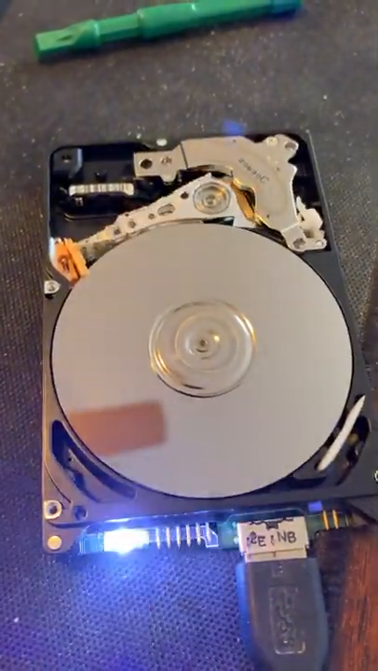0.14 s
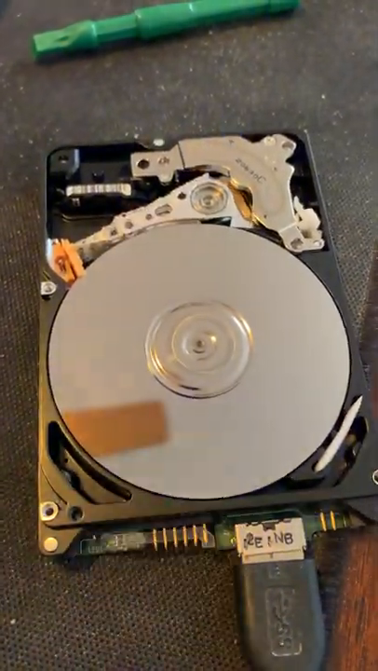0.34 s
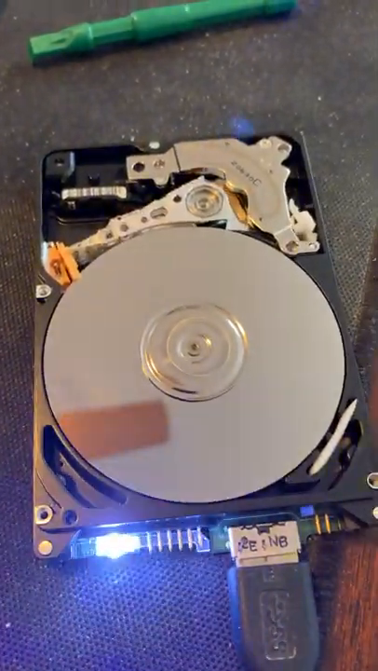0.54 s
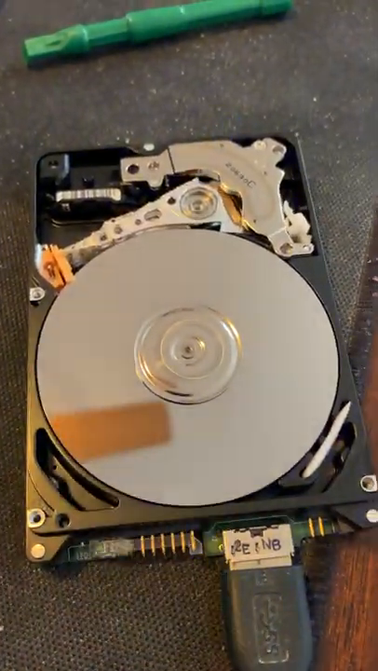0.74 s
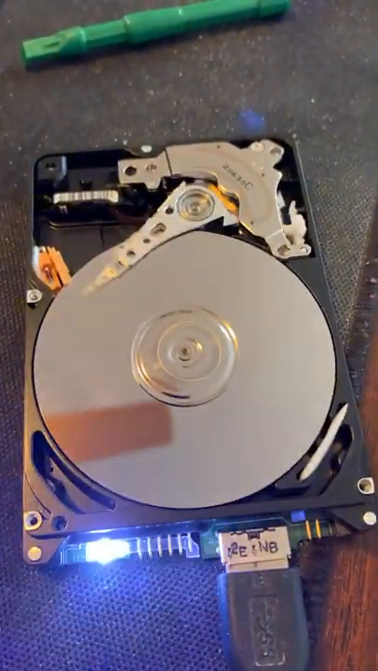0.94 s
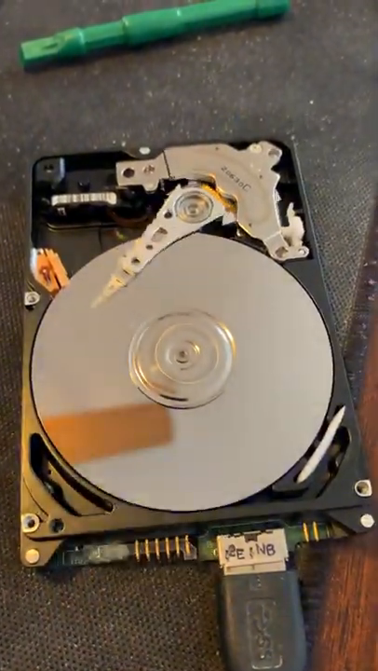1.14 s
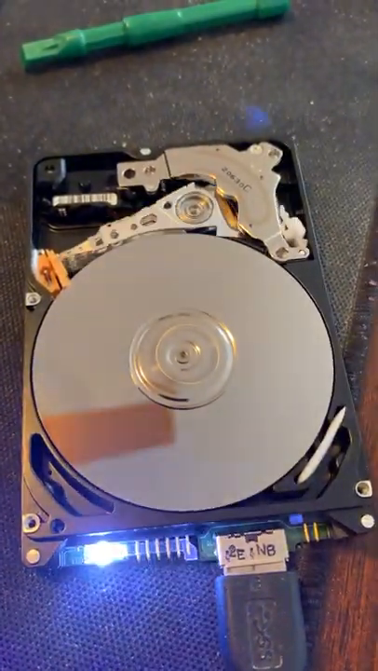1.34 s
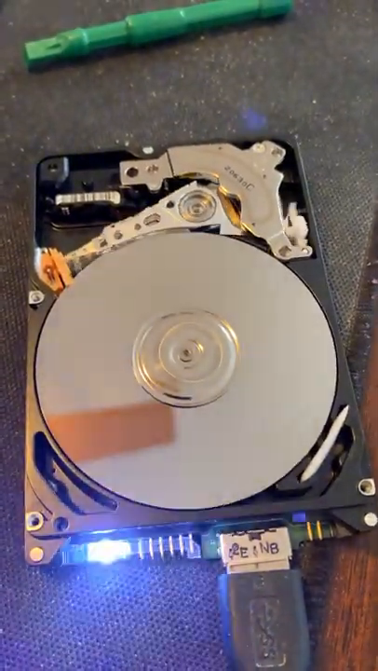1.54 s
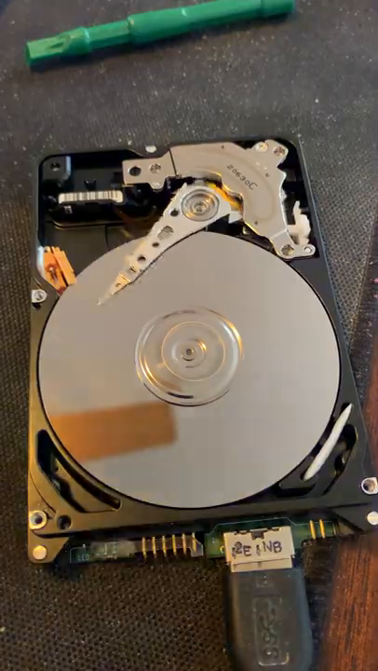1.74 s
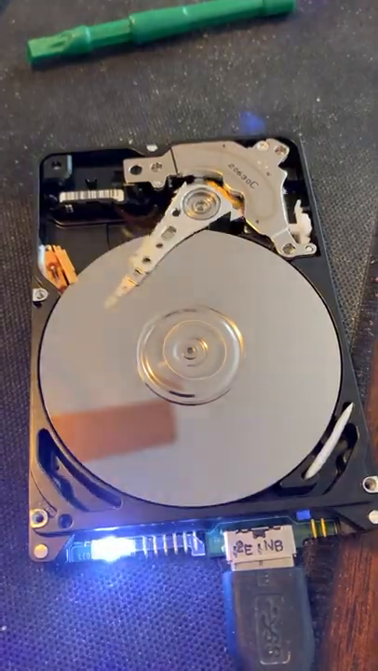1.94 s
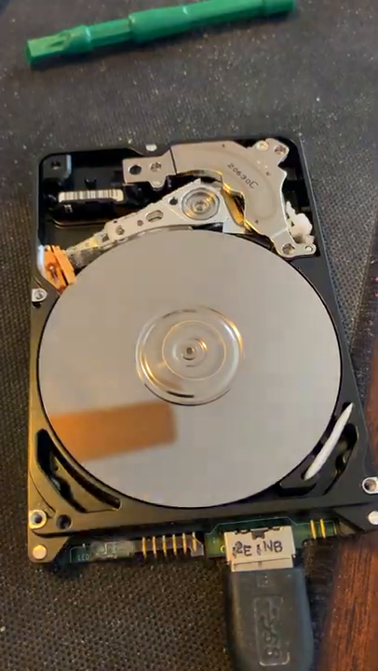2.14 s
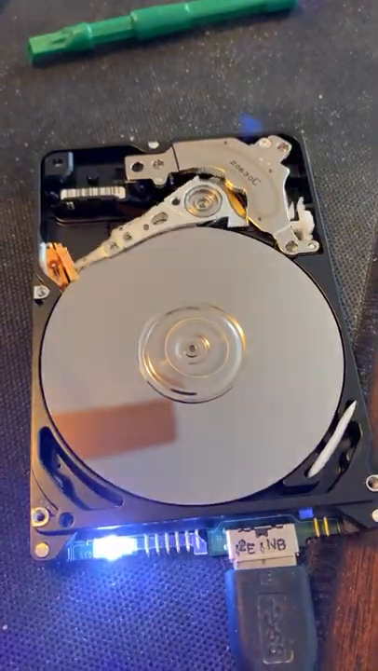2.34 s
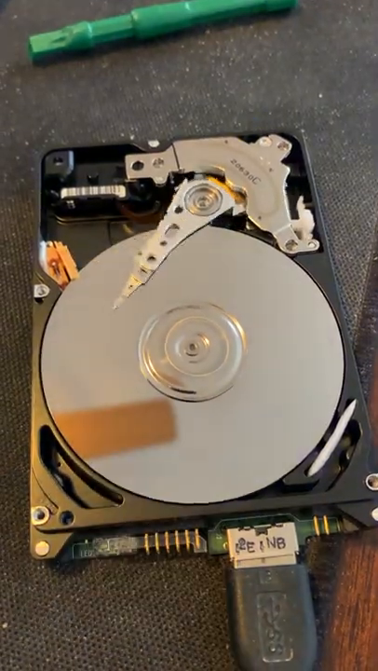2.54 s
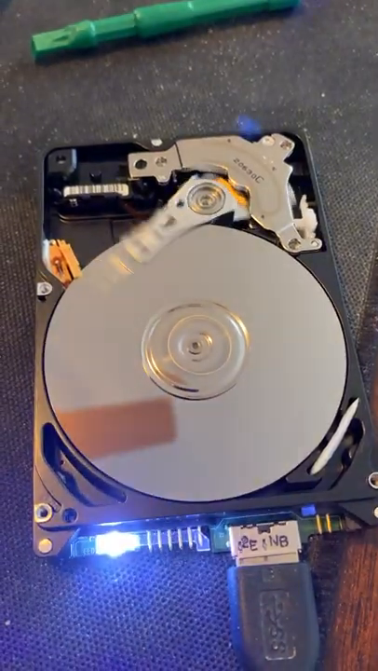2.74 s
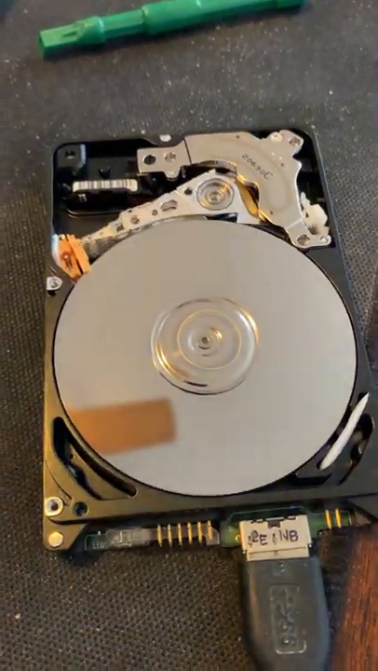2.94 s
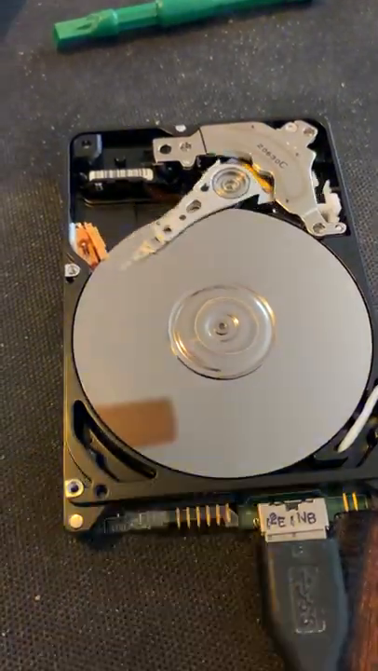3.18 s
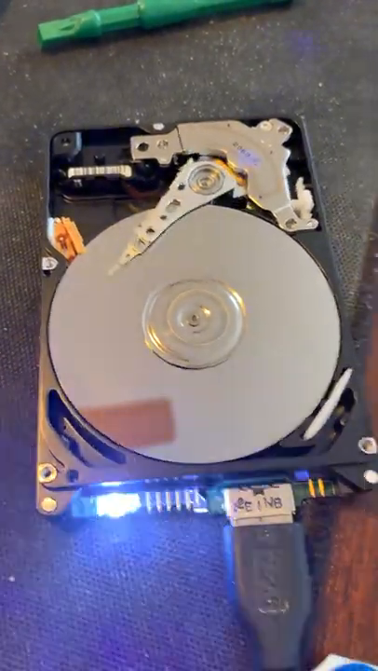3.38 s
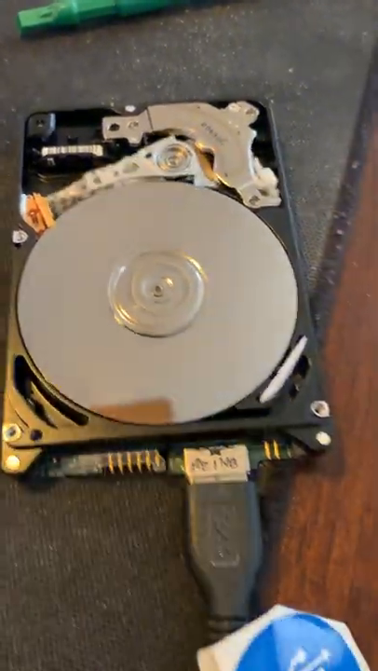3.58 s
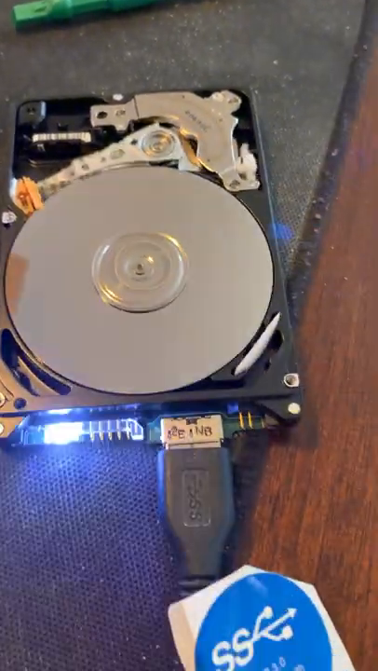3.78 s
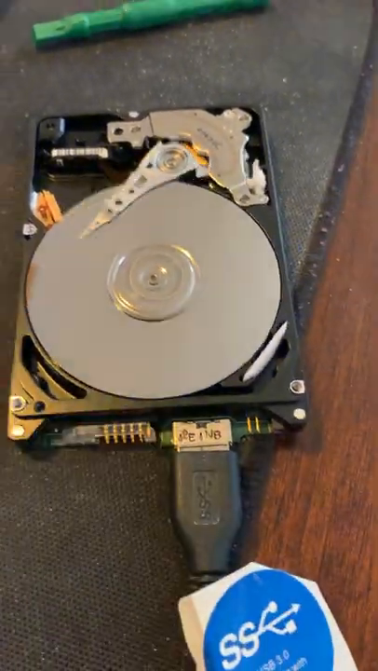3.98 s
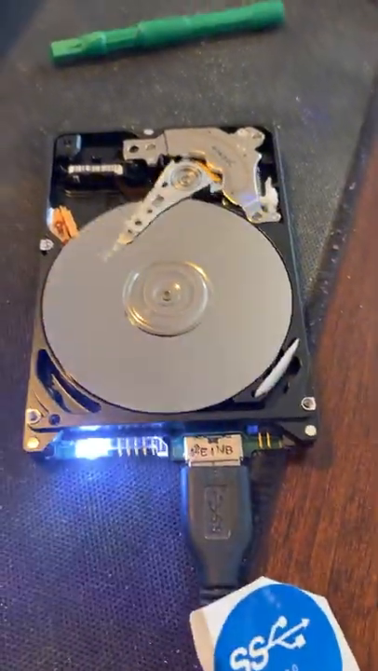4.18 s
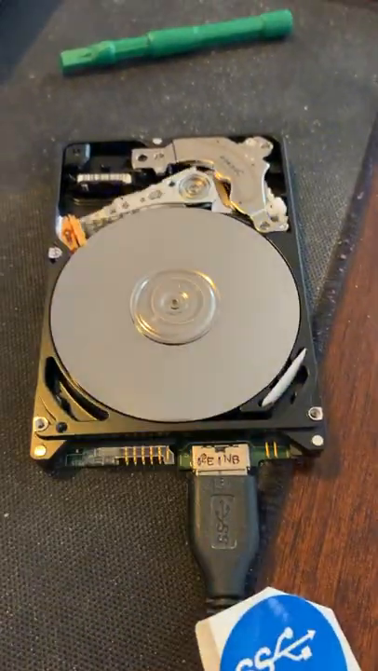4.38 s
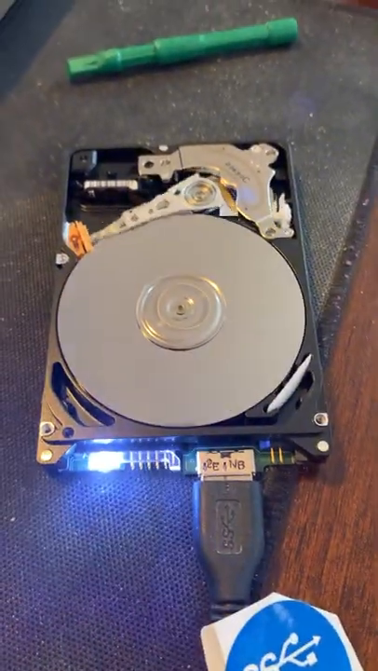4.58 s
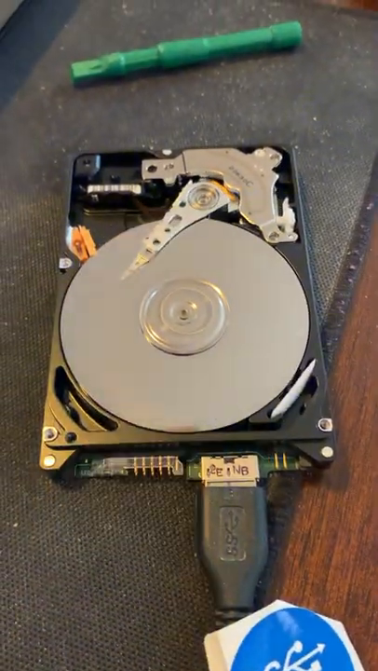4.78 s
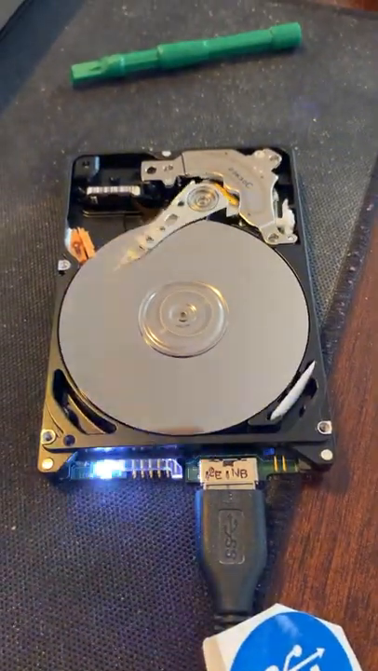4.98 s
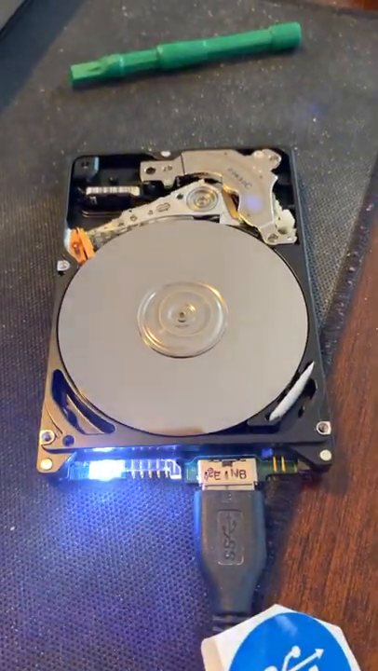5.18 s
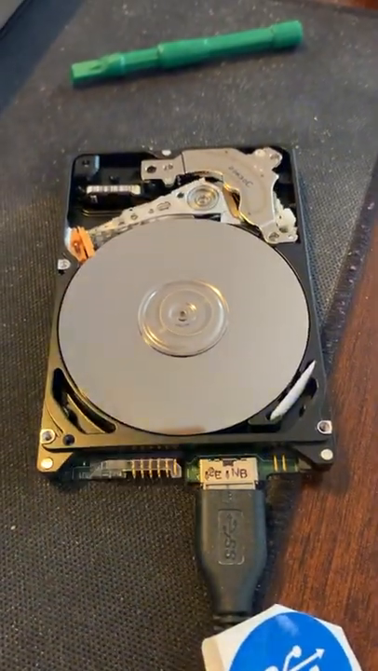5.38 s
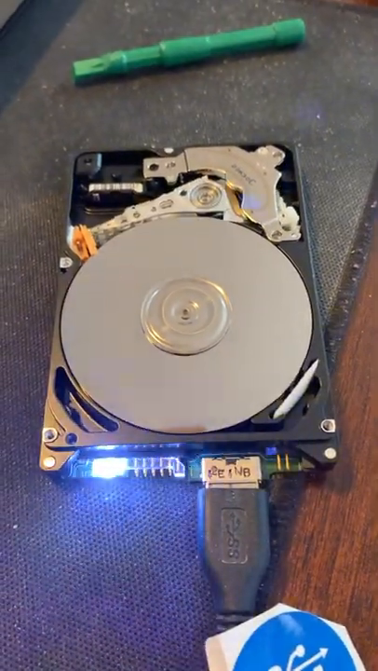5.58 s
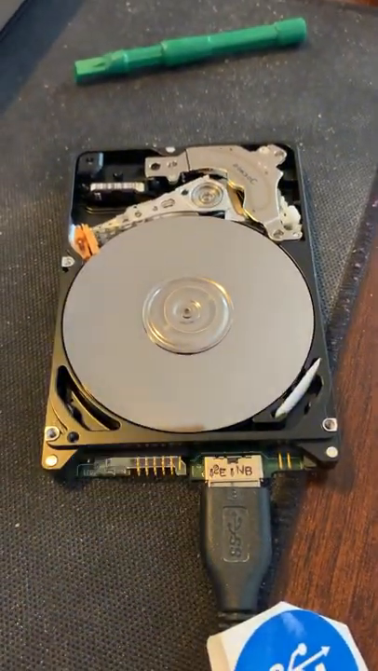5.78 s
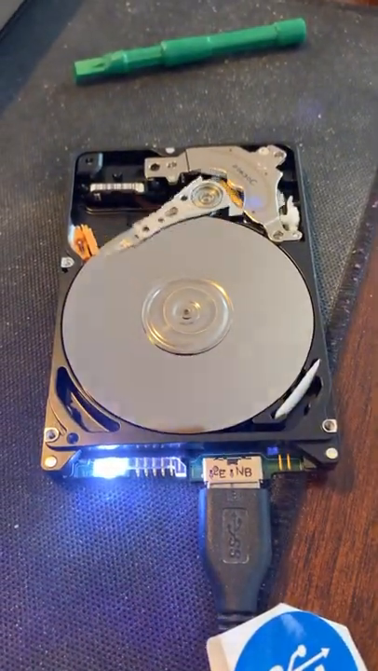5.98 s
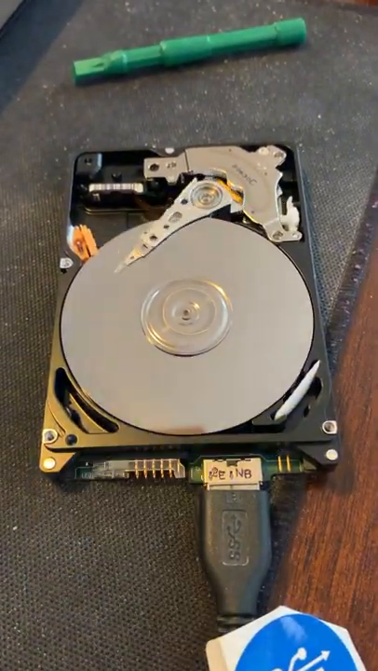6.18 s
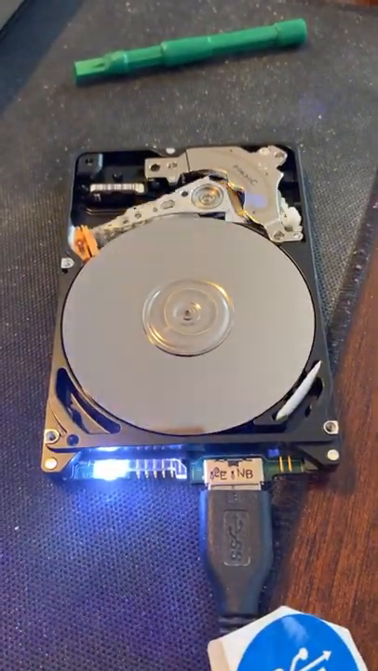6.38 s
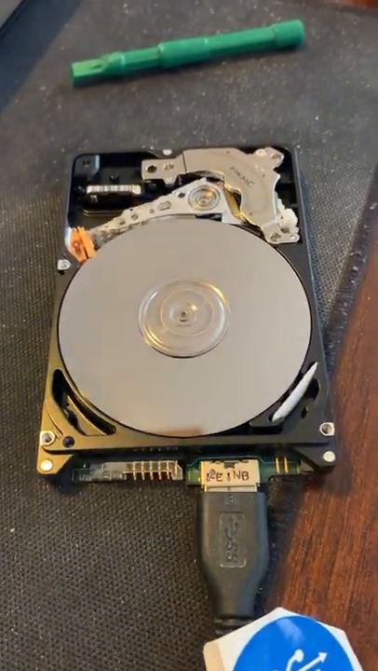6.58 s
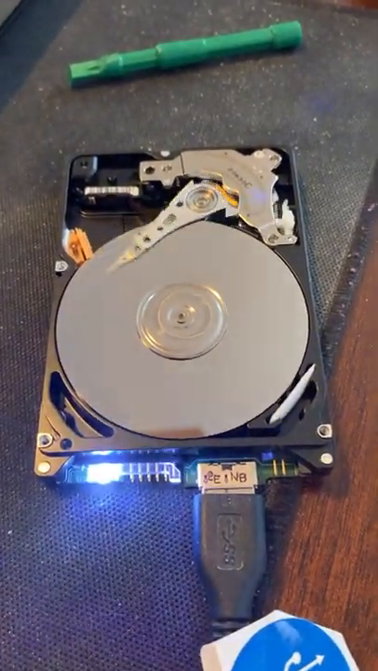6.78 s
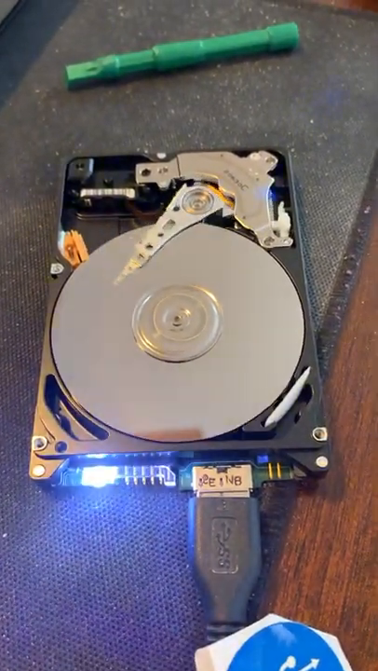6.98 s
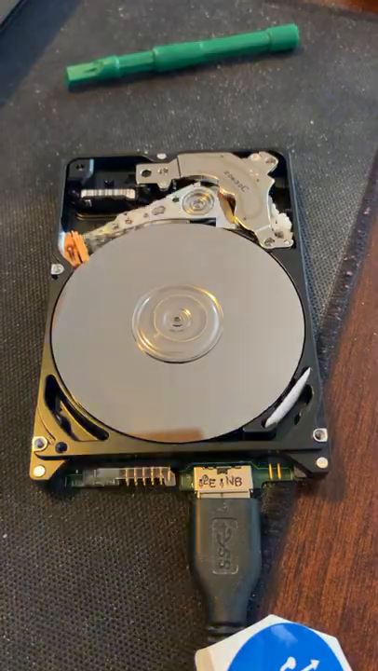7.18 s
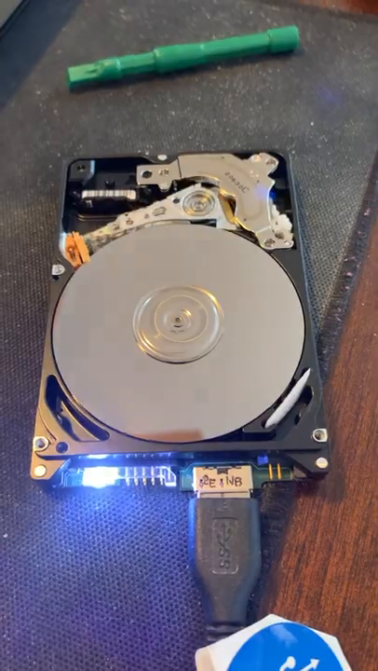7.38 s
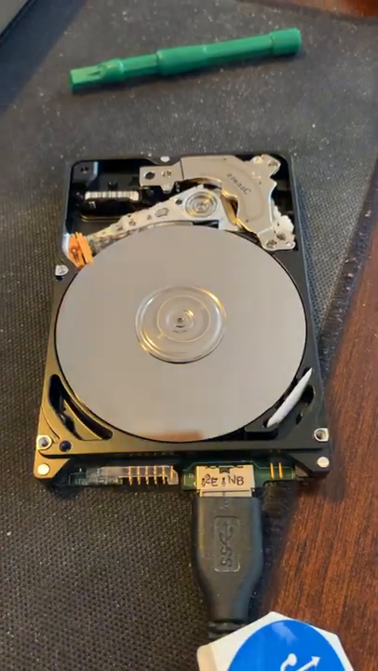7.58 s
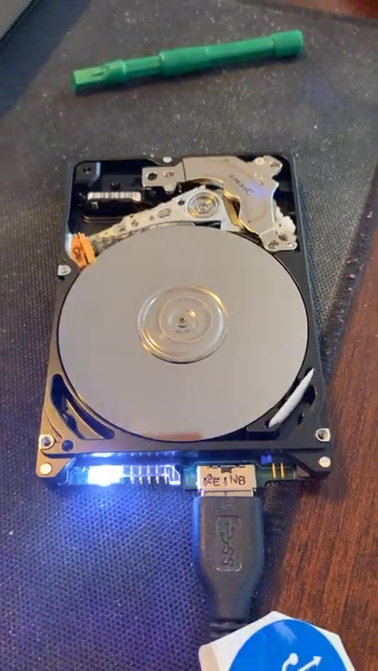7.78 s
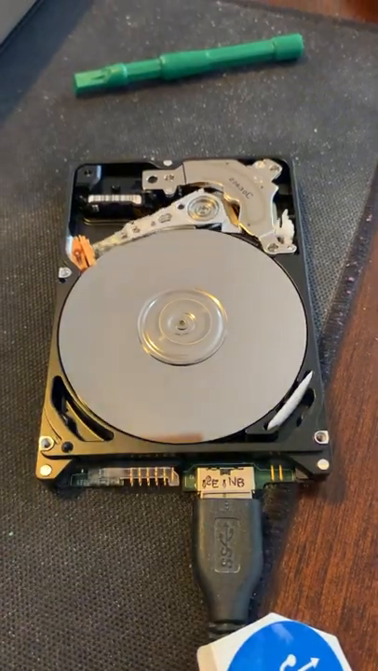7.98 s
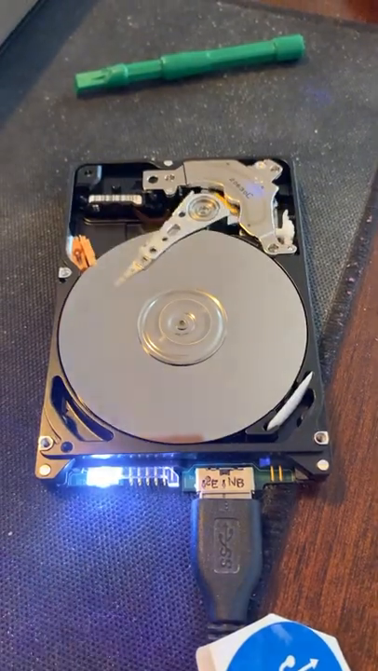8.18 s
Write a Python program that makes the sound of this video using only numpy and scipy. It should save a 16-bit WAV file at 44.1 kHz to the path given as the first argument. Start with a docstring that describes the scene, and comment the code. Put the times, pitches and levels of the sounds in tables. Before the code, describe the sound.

An opened portable hard drive spins on a desk with a faint airy hiss and a low wavering hum, heard from a phone close above. Its head arm hits the stop with a sharp, bright clack right at the start, then at about 1.4, 2.1, 2.9, 3.6, 4.4, 5.1, 6.4 and 7.2 seconds. The clacks are the loudest sounds, all similar in level, each led by a tiny scrape and ringing briefly in the small room. After each one the hiss swells slightly, and a light tick and a small hollow knock follow as the arm slides out again. In the longer rests, around 0.5, 5.5 and 7.6 seconds, the motor adds a very faint, high sizzle and thin whine. One soft, dull bump on the desk comes at about 3.1 seconds. The hiss and hum carry on to the end, just after 8 seconds.

```python
"""Sharp, repeated clacks over a faint hiss: an opened portable hard drive fails to find its tracks.
On each retry the head arm jerks back, scrapes up its parking ramp, hits the stop, rests, then slides out.
Air hisses round the platter, the motor driver sizzles, the drive hums, and the desk takes one soft bump.
A small room rings after each clack. A phone close above hears it all through two microphone ports."""
import sys
import numpy as np
from scipy import signal
from scipy.fft import rfft, irfft
from scipy.io import wavfile
from scipy.ndimage import uniform_filter1d

SR = 44100
rng = np.random.default_rng(int(sys.argv[2]) if len(sys.argv) > 2 else 0)


def unload_audio(sound):
    """Save the sound as a 16-bit wav file, at the path given as the first command line argument."""
    columns = np.transpose(np.atleast_2d(sound))
    # keep every value between -1 and 1, then stretch to whole-number steps
    steps = np.round(np.clip(columns, -1, 1) * 32767)
    wavfile.write(sys.argv[1], SR, steps.astype(np.int16))


N = 362943
TIME = np.arange(N) / SR

SHORT_S, LONG_S = .268, .861  # rests on the stop
SLIDE_S = .091  # from release until the heads leave the ramp
# arm hitting its stop: clack_s, clack_db, body_re_treble_db, top_shelf_db, scrape_db, rest_s, knock_db
RETRIES = [(.0422, -15, -9.5, 1.5, -40, 0.84, -47), (1.3694, -15, -10, 1.5, -38, SHORT_S, -56.5),
           (2.112, -15.5, -10, -0.5, -40.5, SHORT_S, -43.5), (2.8585, -15.5, -7, 4, -40.5, SHORT_S, -47.5),
           (3.6053, -15.5, -10, -0.5, -39, SHORT_S, -56.5), (4.3531, -16, -7.5, -3.5, -43.5, SHORT_S, -61),
           (5.1009, -16.5, -11.5, 0.5, -40.5, LONG_S, -48), (6.4398, -16, -7.5, 0, -43, SHORT_S, -49.5),
           (7.1852, -16.5, -11.5, 0.5, -43.5, LONG_S, -45.5)]


def undb(db):
    """Decibels to gain."""
    return 10 ** (np.asarray(db) / 20)


def unit(x):
    """Scale to rms 1."""
    return x / np.sqrt(np.mean(x ** 2) + 1e-20)


def gains(points, hz):
    """Gain of a (freq_hz, gain_db) table at hz."""
    freq_hz, gain_db = np.transpose(points)
    return undb(np.interp(np.log(hz + 1), np.log(freq_hz), gain_db))


def colour(x, points):
    """Filter by a (freq_hz, gain_db) table."""
    return irfft(rfft(x) * gains(points, np.fft.rfftfreq(len(x), 1 / SR)), len(x))


def noise(points, size=N):
    """Coloured noise, rms 1."""
    return unit(colour(rng.standard_normal(size), points))


def narrow(hz, width_hz):
    """Noise in one sharp resonance: a wavering line."""
    offset_hz = np.fft.rfftfreq(N, 1 / SR) - hz
    return unit(irfft(rfft(rng.standard_normal(N)) / (1 + (2 * offset_hz / width_hz) ** 2), N))


def drift(rate_hz):
    """Slow random wander, rms 1."""
    step = int(SR / rate_hz)
    stairs = np.repeat(rng.standard_normal(N // step + 1), step)
    return unit(uniform_filter1d(stairs, step)[:N])


def decay(age_s, t60_s):
    """Exponential fall, 60 dB in t60_s."""
    return np.exp(-np.log(1000) * age_s / t60_s)


def ringing(force, t60_s):
    """Envelope of a resonance that swells under a force, then dies."""
    return signal.lfilter([1], [1, -decay(1 / SR, t60_s)], force)


def at_level(x, db):
    """Scale a short sound so its energy, spread over 10 ms, has level db."""
    return x * undb(db) * np.sqrt(.01 * SR / np.sum(x ** 2))


def add(track, x, start_s):
    """Mix x into track from start_s."""
    i = int(round(start_s * SR))
    x, i = x[max(-i, 0):], max(i, 0)
    track[i:i + len(x)] += x[:N - i]


def near_db(time_s):
    """Small sounds weaken as the phone draws back."""
    # distance loss: time_s, gain_db
    nearness = [(3.2, -2), (4.3, -3.5), (8.2, -5)]
    return np.interp(time_s, *np.transpose(nearness))


def ports(direct, diffuse=0):
    """Two microphone ports: the right hears later; diffuse sound differs between them."""
    # left ahead of right: freq_hz, phase_rad
    port_phase = [(0, 0), (1900, .35), (3000, 1.6), (3800, 1.7), (4750, 3.14), (15200, 18.85)]
    # left over right: freq_hz, gain_db
    port_balance = [(60, 1.8), (330, 3.5), (700, -0.5), (1600, -0.5), (2900, -5), (3700, 0), (15000, 0)]
    hz = np.fft.rfftfreq(N, 1 / SR)
    lead = np.exp(.5j * np.interp(hz, *np.transpose(port_phase))) * np.sqrt(gains(port_balance, hz))
    return np.array([irfft(rfft(direct + diffuse) * lead, N), irfft(rfft(direct - diffuse) / lead, N)])


def hum(rumble_db=-64.5, diffuse_db=-69, rumble_fall_db=2, flicker_db=3.0):
    """Low wavering hum of the spinning drive, with fainter tones, over room rumble; both fade a little."""
    # hum tones: pitch_hz, waver_hz, midway_level_db, total_fall_db
    hum_tones = [(56.6, 6.1, -69.5, 1.5), (86.8, 2.3, -64.5, 2.5), (113.4, 4, -70.5, 12),
                 (210.8, 3.2, -73.5, 2), (314.3, 2, -73.5, -1), (368.4, 2, -74, 2.5)]
    # room rumble: freq_hz, density_db
    rumble_spectrum = [(20, -15.5), (40, -8), (70, 2), (140, -3), (260, -6.5), (370, -4), (470, -15.5),
                       (900, -17), (1400, -30.5), (3000, -42.5)]
    slope = .5 - TIME / TIME[-1]
    tones = np.zeros(N)
    for pitch_hz, waver_hz, level_db, fall_db in hum_tones:
        tone = np.sin(2 * np.pi * np.cumsum(pitch_hz + waver_hz * drift(12)) / SR)
        tones += undb(level_db + fall_db * slope) * unit(tone * undb(flicker_db * drift(10)))
    rumble = undb(rumble_db + rumble_fall_db * slope) * noise(rumble_spectrum)
    diffuse = noise([(30, -9.5), (100, -4.5), (350, -1), (600, -4), (1100, -5), (2000, -13),
                     (4000, -37.5)])
    return ports(tones + rumble, undb(diffuse_db) * diffuse)


def platter(parked_db=-53, swell_db=3.0, swell_s=.16, settle_s=.12, onset_s=.023, flutter_db=.96):
    """Air rushes round the platter; more hiss with the heads parked, most as they slide back on."""
    # air rush: time_s, level_db
    air_level = [(0, -60), (1.2, -56.5), (2.7, -57), (3.5, -58), (4.2, -59.5), (6.3, -58.5), (8.2, -58.5)]
    # air rush: freq_hz, density_db
    air_spectrum = [(900, -15.5), (1300, -8.5), (1750, -3.5), (2500, -6), (3050, 2), (3450, -5.5),
                    (3900, 1.5), (4700, -8), (5600, -6.5), (6500, -23), (8500, -23.5), (12000, -30),
                    (15500, -44)]
    # hiss with heads on the ramp: freq_hz, density_db
    parked_spectrum = [(900, -21.5), (1300, -8.5), (1750, -5.5), (2500, -8.5), (3050, 4.5), (3450, -6),
                       (3900, 0), (4700, -7.5), (5600, -6.5), (7000, -16), (8700, -17), (11000, -32),
                       (15500, -38.5)]
    parked = np.zeros(N)
    for clack_s, *_, rest_s, _ in RETRIES:
        end_s = clack_s + rest_s + SLIDE_S
        corners_s = [clack_s - onset_s, clack_s + onset_s, end_s - swell_s, end_s, end_s + settle_s]
        parked += np.interp(TIME, corners_s, [0, 1, 1, undb(swell_db), 0])
    parked *= undb(parked_db + near_db(TIME))
    air = undb(np.interp(TIME, *np.transpose(air_level)))
    direct, diffuse = (air * noise(air_spectrum) + parked * noise(parked_spectrum) for _ in range(2))
    return ports(direct, .21 * diffuse) * undb(flutter_db * drift(25))


def spindle(idle_db=-87, push_db=-74.5, sizzle_re_push_db=-3, sag_db_per_s=18):
    """The motor driver sizzles faintly; in a long rest it pushes harder, with thin whines at first."""
    # driver sizzle: freq_hz, density_db
    sizzle_spectrum = [(4000, 0), (6500, -44), (8700, 27), (11000, 1.5), (13000, 11), (15500, -21)]
    # driver whines: pitch_hz, width_hz, level_re_push_db
    whine_lines = [(8500, 140, 1), (11850, 160, -3), (12300, 160, 1.5)]
    push_after_s, attack_s, whine_s, release_s = .412, .054, .17, .04
    push, whine_gain = np.zeros(N), np.zeros(N)
    for clack_s, *_, rest_s, _ in RETRIES:
        if rest_s > push_after_s:
            age_s = np.maximum(TIME - clack_s - push_after_s, 0)
            held = lambda end_s: np.interp(age_s, [0, attack_s, end_s, end_s + release_s], [0, 1, 1, 0])
            push += held(rest_s - push_after_s) * undb(push_db + sizzle_re_push_db - sag_db_per_s * age_s)
            whine_gain += held(whine_s) * undb(push_db)
    sizzle = (undb(idle_db) + push) * noise(sizzle_spectrum)
    whines = sum(undb(db) * narrow(hz, width_hz) for hz, width_hz, db in whine_lines)
    return sizzle + whine_gain * whines


def bump(start_s=3.098, level_db=-42, rise_s=.02, t60_s=.46):
    """A soft, dull bump against the desk."""
    # desk thud: freq_hz, density_db
    bump_spectrum = [(20, -20.5), (50, 2.5), (140, 3), (250, -6.5), (420, 0), (520, -13.5), (680, -13),
                     (1000, -24.5), (2000, -45)]
    age_s = np.maximum(TIME - start_s, 0)
    envelope = np.minimum(age_s / rise_s, 1) * decay(np.maximum(age_s - rise_s, 0), t60_s)
    return undb(level_db) * envelope * noise(bump_spectrum)


def room(x, early_db=-23, late_db=-19.5, gap_s=.0052, wall_s=.023, wall_db=-33):
    """Quick desk reflections, one off a far wall, and a small room's tail, shorter at the top."""
    # reflections: freq_hz, density_db
    room_spectrum = [(800, -4.5), (2000, 3), (3500, -4.5), (4500, -7), (6000, 2), (6800, -2.5), (7600, 2),
                     (8200, -8.5), (8800, -5.5), (10600, -1.5), (11300, -3), (12600, -6.5), (13300, 1.5),
                     (14700, -4), (15600, -11.5)]
    t = np.arange(SR // 2) / SR
    wall = undb(wall_db) * signal.unit_impulse(len(t), int(wall_s * SR))
    fade = lambda t60_s: decay(t, t60_s) * (t > gap_s)
    early, late = (noise(room_spectrum, len(t)) for _ in range(2))
    low = colour(late, [(10500, 0), (12500, -30)])
    desk = undb(early_db) * unit(early * fade(t60_s=.025))
    tail = undb(late_db) * unit(low * fade(t60_s=.39) + (late - low) * fade(t60_s=.29))
    return signal.fftconvolve(x, wall + (desk + tail) / np.sqrt(len(t)))[:N]


def tap(spectrum, db, t60_s, rise_s):
    """A small impact: a noise burst that dies quickly."""
    t = np.arange(2048) / SR
    return at_level(noise(spectrum, len(t)) * (1 - np.exp(-t / rise_s)) * decay(t, t60_s), db)


def tick(db):
    """The arm ticks lightly against its stop."""
    # light contact: freq_hz, density_db
    tick_spectrum = [(1500, -18), (3500, -8), (6000, -19), (8200, 4), (10300, -1), (12000, -13.5),
                     (15500, -20.5)]
    return tap(tick_spectrum, db, t60_s=.015, rise_s=.0012)


def knock(db):
    """A hollow knock as the arm lurches over the platter."""
    # lurching arm: freq_hz, density_db
    knock_spectrum = [(900, -42), (1500, -10), (1780, 4.5), (2000, -1), (2400, -16), (3100, 0.5),
                      (4200, -2), (5600, -5), (7500, -19.5), (9000, -21.5), (12000, -31.5), (15500, -42)]
    return tap(knock_spectrum, db, t60_s=.037, rise_s=.001)


def jerk(db):
    """The coil kicks the arm into motion."""
    # coil kick: freq_hz, density_db
    jerk_spectrum = [(800, -31.5), (1500, -4), (2200, 5), (2600, -13), (3600, 5), (5600, -2), (7500, -13),
                     (10000, -10.5), (12500, -24.5), (15500, -25.5)]
    return tap(jerk_spectrum, db, t60_s=.03, rise_s=.00098)


def scrape(t, start_s, rise_s=.0029, fade_s=.0071, grit=.83):
    """The lift tab meets the plastic ramp and slides up it in tiny slips."""
    # tab on ramp: freq_hz, density_db
    scrape_spectrum = [(600, -41), (1200, -15), (1700, 1), (2500, -10), (3400, -0.5), (5000, -4.5),
                       (7200, -11.5), (9800, -2.5), (11500, -13), (15500, -15)]
    age_s = np.maximum(t - start_s, 0)
    slips = np.exp(grit * unit(uniform_filter1d(rng.standard_normal(len(t)), size=25)))
    slide = (1 - np.exp(-age_s / rise_s)) * np.exp(-age_s / fade_s)
    return colour(slide * slips * rng.standard_normal(len(t)), scrape_spectrum)


def chatter(t, start_s=-.0004, hold_s=.0011, rattle_db=-21):
    """Contact force at the stop: steep rise, short hold, quick fall into a weak rattle."""
    rise_db_per_s, fall_db_per_s, rattle_db_per_s = 12000, 7000, 1700
    before_s, after_s = np.maximum(start_s - t, 0), np.maximum(t - start_s - hold_s, 0)
    rattle = undb(rattle_db - rattle_db_per_s * after_s)
    return undb(-rise_db_per_s * before_s) * (undb(-fall_db_per_s * after_s) + rattle)


def clack(t, body_db, top_db, scatter_db=1.5, detune=.0036, shiver_db=-11):
    """The arm chatters on the stop: a bright crack, swelling modes, then shivering suspensions."""
    # contact crack: freq_hz, density_db
    crack_spectrum = [(500, -66.5), (1000, -49), (1400, -23.5), (2000, -18.5), (2600, -19), (3200, -7.5),
                      (5200, -3.5), (6200, -11), (7500, -8.5), (9500, 3), (11300, -4.5), (13200, -1.5),
                      (13700, -7), (15500, -6)]
    # arm and chassis modes: pitch_hz, level_re_crack_db, t60_s
    modes = [(1775, -25, .02), (3586, -15.5, 0.0099), (4420, -14.5, 0.01), (6910, -16.5, 0.0014),
             (8194, -1, .005), (8660, -14.5, .012), (10400, -12.5, .012), (11800, -15, .007),
             (14980, -10.5, 0.0043)]
    # crowded modes of the thin head suspensions: freq_hz, density_db
    shiver_spectrum = [(7600, -37.5), (8400, -9), (8900, -1.5), (9400, -4), (10000, 0), (10500, 1.5),
                       (11300, -19), (13800, -16), (14550, -3.5), (15300, -22)]
    force = chatter(t)
    sound = unit(colour(force * rng.standard_normal(len(t)), crack_spectrum))
    for (hz, db, t60_s), (size, shift, phase) in zip(modes, rng.standard_normal((len(modes), 3))):
        ring = ringing(force, t60_s) * np.sin(2 * np.pi * (hz * (1 + detune * shift) * t + phase))
        sound += unit(ring) * undb(db + scatter_db * size)
    sound += undb(shiver_db) * unit(ringing(force, t60_s=.065) * noise(shiver_spectrum, len(t)))
    sound = colour(sound, [(11000, 0), (13000, top_db)])  # harder contact: more top
    body = colour(sound, [(6800, 0), (7400, -60)])  # squarer hit: more in the low modes
    return unit(sound - body) + undb(body_db) * unit(body)


def arm(twitch_db=-46, jerk_db=-43.5, release_db=-48, settle_db=-57):
    """Each retry: twitch, jerk back, scrape up the ramp, clack, rest, tick free, knock off the ramp."""
    # lift tab catching on the ramp: lead_s, level_re_scrape_db
    catches = [(0.02, -1), (0.005, -6)]
    # mid-search lurches: time_s, level_db
    lurches = [(1.9083, -43.5), (4.8944, -54.5)]
    retreat_s, twitch_s, settle_s, tap_lead_s = .035, .0055, .349, .0015
    track = np.zeros(N)
    t = np.arange(-.025, .06, 1 / SR)  # contact at 0
    for clack_s, clack_db, body_db, top_db, scrape_db, rest_s, knock_db in RETRIES:
        for lead_s, db in catches:
            add(track, at_level(scrape(t, -lead_s), scrape_db + db), clack_s + t[0])
        add(track, at_level(clack(t, body_db, top_db), clack_db), clack_s + t[0])
        distance_db = near_db(clack_s)
        taps = [(-retreat_s - twitch_s, jerk(twitch_db + distance_db)),
                (-retreat_s, jerk(jerk_db + distance_db)),
                (rest_s, tick(release_db + distance_db)),
                (rest_s + SLIDE_S, knock(knock_db))]
        if rest_s > settle_s:  # the arm settles during a long rest
            taps.append((settle_s, tick(settle_db + distance_db)))
        for offset_s, sound in taps:
            add(track, sound, clack_s + offset_s - tap_lead_s)
    for time_s, db in lurches:
        add(track, knock(db), time_s - tap_lead_s)
    return track


def scene():
    """Drive, room and desk at the two ports."""
    moves = arm()
    common = moves + room(moves) + spindle() + bump()
    return ports(common, diffuse=.36 * room(moves)) + platter() + hum()


def record(dry, cutoff_hz=15550):
    """The phone cuts the top."""
    return signal.sosfilt(signal.ellip(8, .2, 70, cutoff_hz, fs=SR, output="sos"), dry)


dry = scene()
out = record(dry)
unload_audio(out)
```